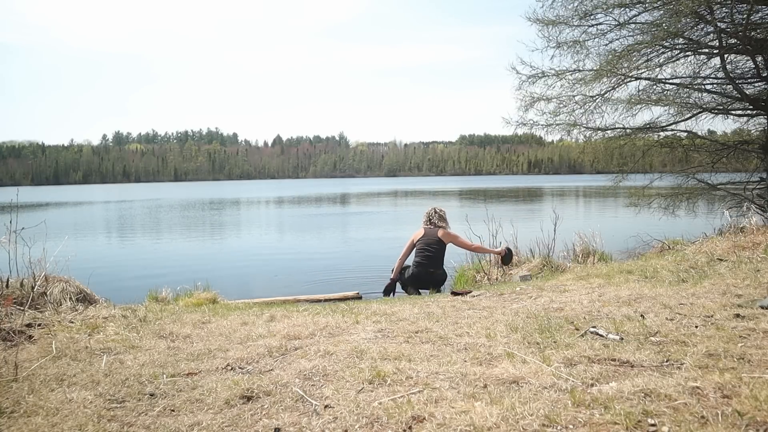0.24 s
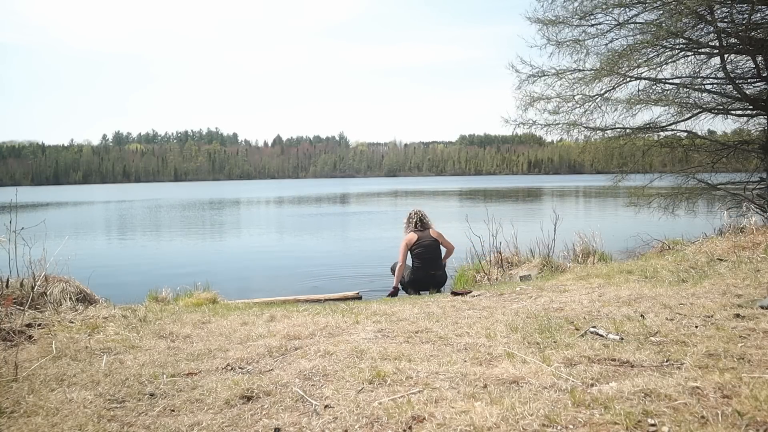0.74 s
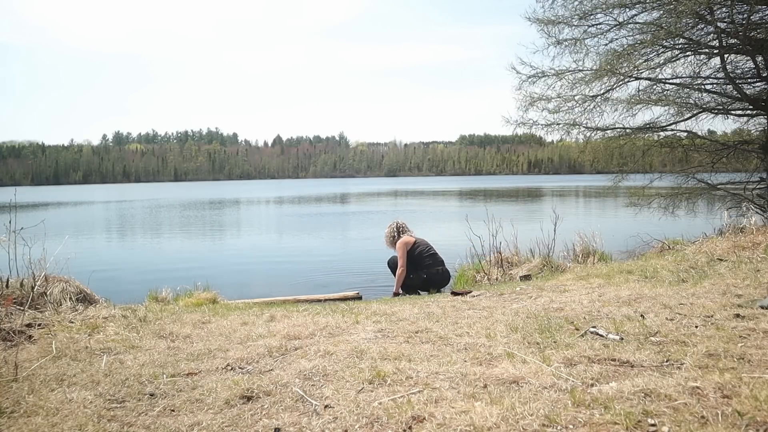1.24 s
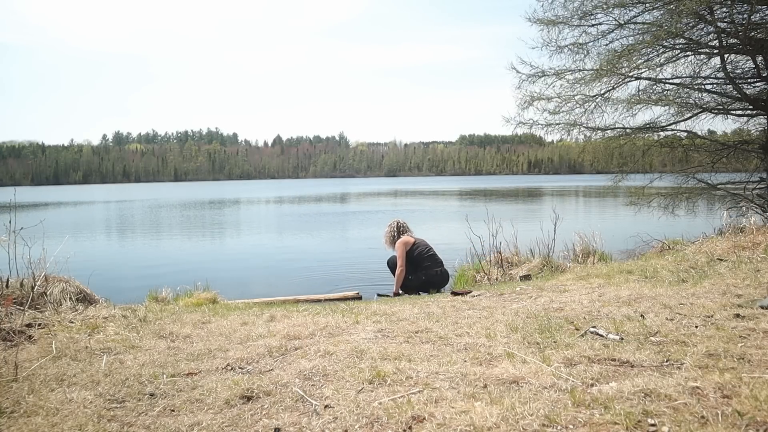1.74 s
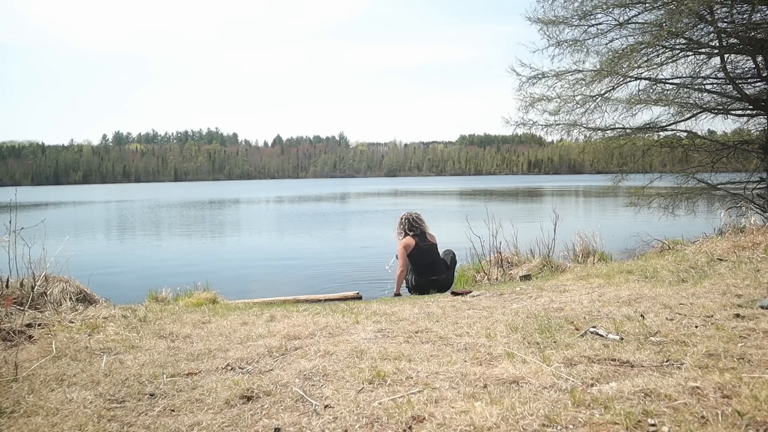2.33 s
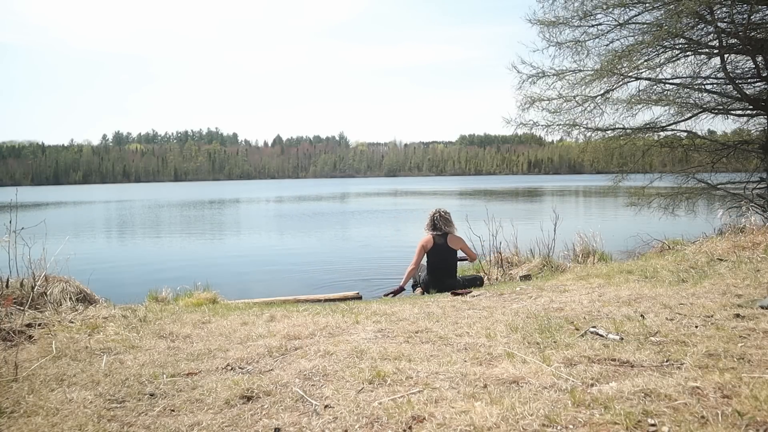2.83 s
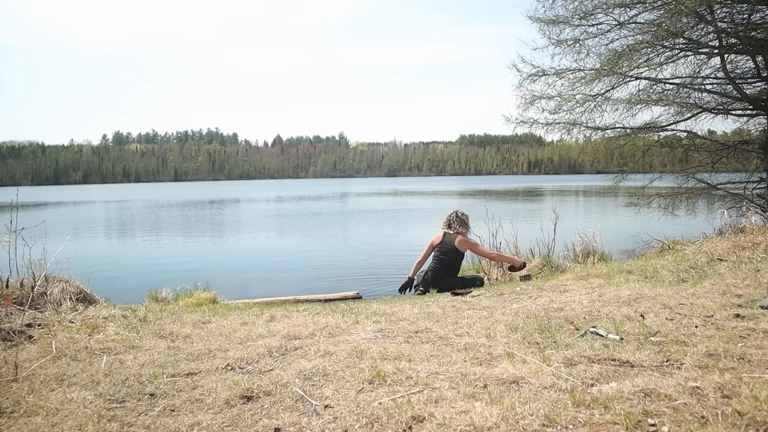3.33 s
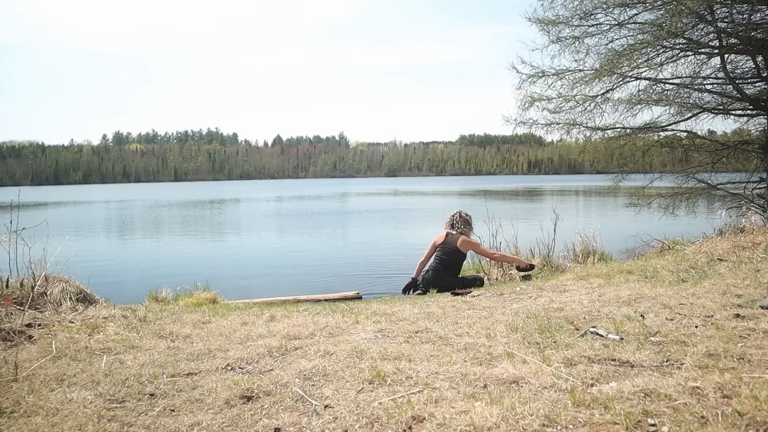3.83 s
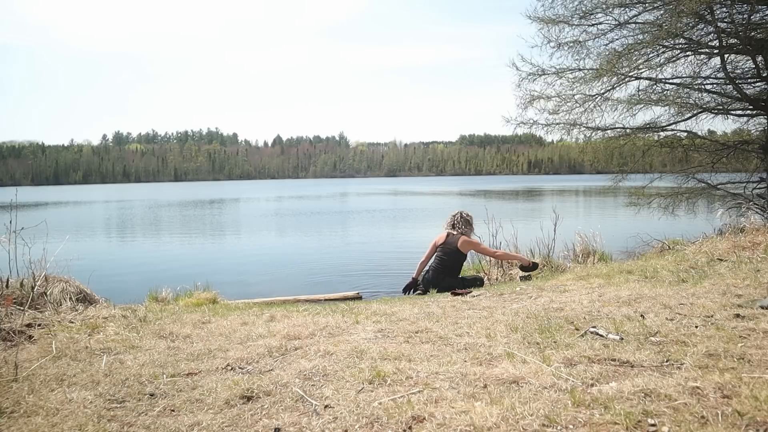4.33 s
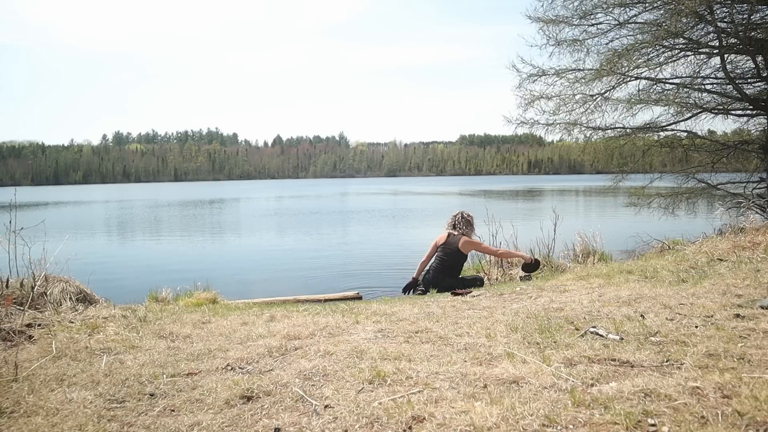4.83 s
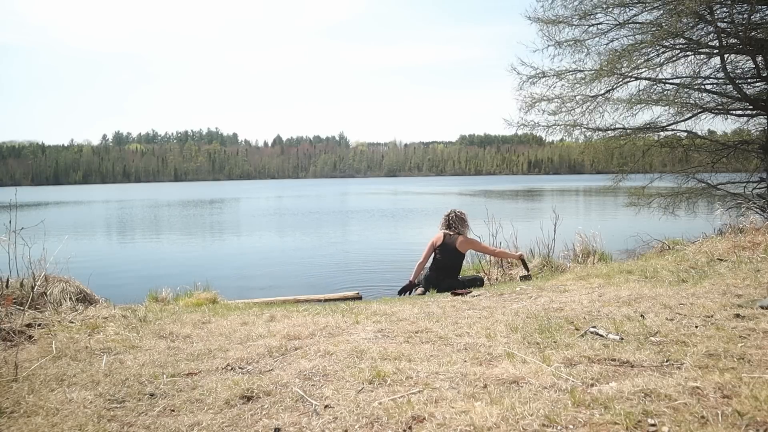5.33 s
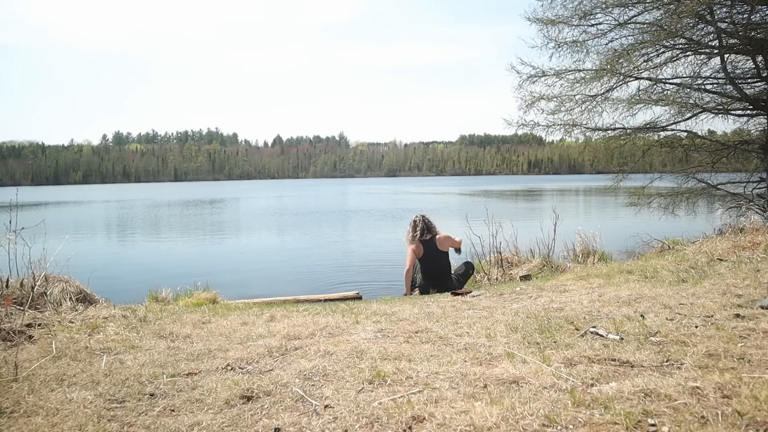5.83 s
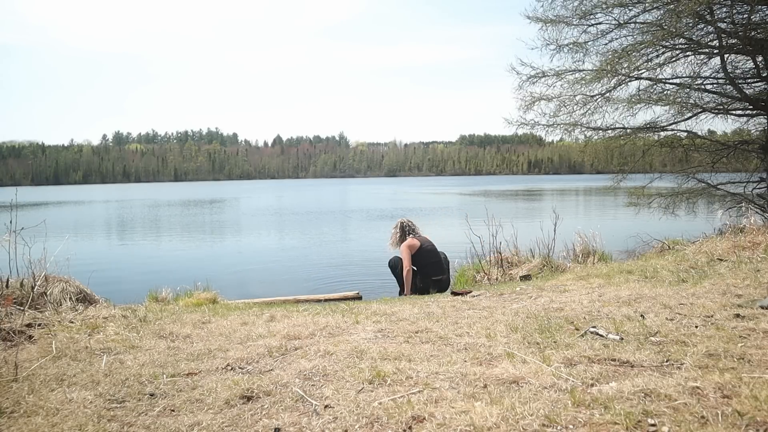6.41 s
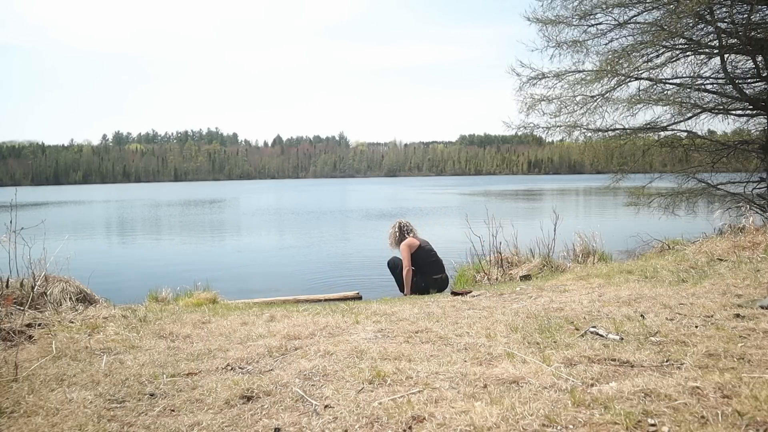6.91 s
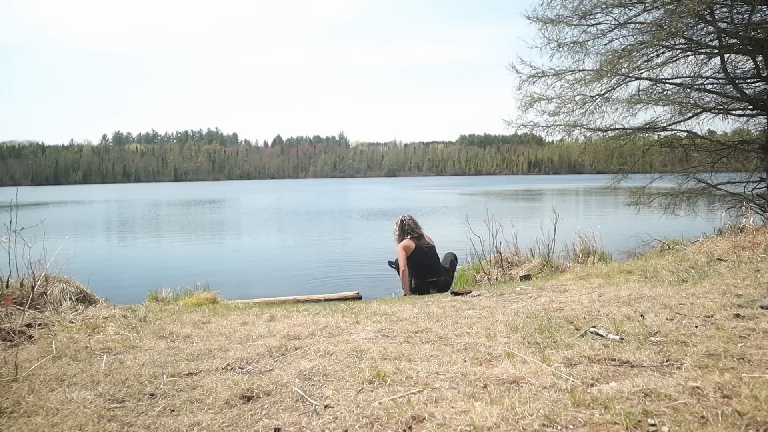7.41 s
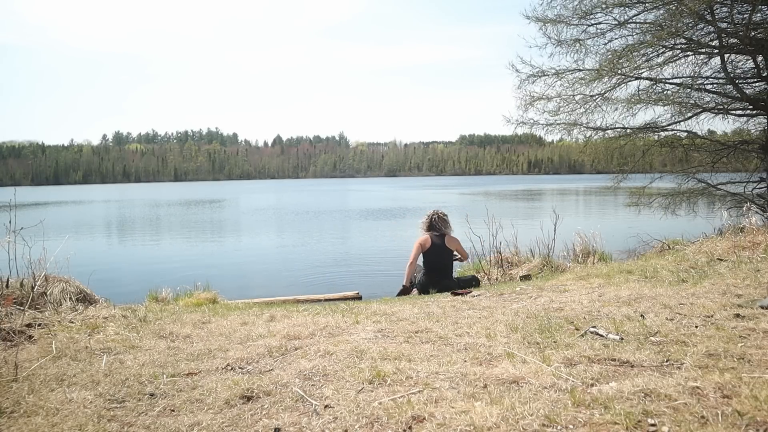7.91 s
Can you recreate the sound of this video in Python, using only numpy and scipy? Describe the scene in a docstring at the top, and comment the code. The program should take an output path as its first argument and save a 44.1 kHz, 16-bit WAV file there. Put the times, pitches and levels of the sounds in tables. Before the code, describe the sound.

Steady pulsing toad trills over a calm lake, with low wind rumbles, small splashes, dry grass ticks, a few cloth rubs and a click.

```python
"""A chorus of toads trills across a lake while gusts rumble on the microphone.
Pulsed tones form the trills and shaped noise the wind; something small chitters in tiny high tones.
Dry grass ticks in noise bursts; water plops as gliding tones and splashes as shaped noise.
Cloth rustles close by as noise through moving resonances, followed by one sharp, ringing click."""
import sys
import numpy as np
from scipy import signal
from scipy.fft import rfft, irfft, next_fast_len
from scipy.io import wavfile
from scipy.ndimage import uniform_filter1d

SR = 44100
rng = np.random.default_rng(int(sys.argv[2]) if len(sys.argv) > 2 else 0)


def int16_out(signal):
    """Quantize to a 16-bit WAV file."""
    q = np.round(np.clip(np.atleast_2d(signal).T, -1, 1) * 32767)
    wavfile.write(sys.argv[1], SR, q.astype(np.int16))


N = 359855
T = np.arange(N) / SR  # time in seconds

# The nearer toads. Each row: start in seconds, end in seconds, pitch in Hz, pulses a second,
# relative level in dB.
NEAR_TOADS = [(-4, 5.26, 1570, 53.4, -8), (-2, 1.05, 1650, 62, -3), (2, 3.63, 1870, 47.5, -5),
              (1.1, 5.4, 1715, 50.2, -6.5), (1.5, 4.85, 1646, 44.5, -1), (3.5, 9, 1488, 51.7, -13),
              (5, 9, 1365, 47.6, -14.5), (4.5, 9, 1754, 52.1, -3.5)]
# The nearest toad, whose rate and pitch drift. Each row: time in seconds, pulses a second,
# pitch in Hz, relative level in dB.
NEAREST_TOAD = [(0, 54.9, 1770, 1), (1.4, 54.9, 1760, 2), (2.4, 53.2, 1720, 5), (3.4, 55.0, 1710, 1),
                (4.8, 55.0, 1715, 3), (6.5, 55.1, 1715, 1), (7.3, 54.3, 1715, 1.5), (8.16, 52.5, 1705, 0)]
# The far crowd. Each row: time in seconds, central pitch in Hz, relative level in dB.
FAR_CROWD = [(0, 1770, 2), (2.5, 1694, 3.5), (4.6, 1683, 5), (5.4, 1672, 3), (8.16, 1678, -4.5)]
# Radiation of the vocal sacs. Each row: frequency in Hz, relative level in dB.
SAC_RADIATION = [(900, -28), (1250, 2.5), (1500, -1.5), (1820, 0.5), (1950, -3.5), (2100, 6), (2600, -34)]
# The whole chorus, softer once several toads fall silent. Each row: time in seconds, mean level in dB.
CHORUS_LEVEL = [(0, -33.5), (4.6, -33.7), (5.35, -37), (7.1, -36), (8.16, -39)]

# Gusts on the microphone. Each row: start in seconds, time held in seconds, level in dB.
GUSTS = [(0, 0.52, -47.5), (.7, .5, -55), (1.33, .2, -43.5), (1.62, 1.536, -39), (4.95, 0.34, -55.5),
         (5.46, .17, -44.5), (5.92, 0.83, -38.5), (6.68, 0.68, -33.5), (7.58, 0.15, -29), (8.05, .11, -29)]
GUST_RISE_S, GUST_FALL_S, LULL_DB = 0.1, 0.15, -70.5
# Spectrum of gust rumble. Each row: frequency in Hz, relative density in dB per Hz.
RUMBLE_SPECTRUM = [(12, -3.5), (30, 1), (60, -3), (100, -9), (160, -15.5), (250, -24.5), (400, -36),
                   (900, -63), (3000, -100)]
# Spectrum of still air over the lake. Each row: frequency in Hz, relative density in dB per Hz.
AIR_SPECTRUM = [(20, -23), (100, 5), (300, 4.5), (700, -0.5), (1200, -1), (2400, -8.5), (4000, -13.5),
                (6500, -13.5), (8500, -16), (11000, -16), (15500, -17.5)]
AIR_DB = -53
# The breeze dies down, with one revival. Each row: time in seconds, sough in the trees in dB,
# hiss in dry grass in dB, both before flutter.
BREEZE = [(0, -43, -43), (.2, -50, -50), (1, -51, -56), (1.5, -50.5, -61.5), (2.2, -55.5, -59.5),
          (3.3, -57.5, -63.5), (5.25, -52.5, -68), (6, -59.5, -71), (8.16, -62, -67)]
# Spectrum of the sough in the trees. Each row: frequency in Hz, relative density in dB per Hz.
TREE_SPECTRUM = [(20, -16), (60, -7), (250, 0), (500, 1), (750, -1), (1050, -2.5), (1400, -1.5),
                 (2300, -10), (5000, -31)]
# Spectrum of the hiss in dry grass. Each row: frequency in Hz, relative density in dB per Hz.
GRASS_SPECTRUM = [(1000, -3), (2300, 2), (3400, 1), (5000, -2), (7000, -1), (8800, 3), (10500, -6.5),
                  (15000, -5.5)]

# Accented chips of the small chitter. Each row: time in seconds, relative peak in dB.
CHIPS = [(0.794, -36), (0.8779, -37), (0.9453, -35.5), (1.0465, -41), (1.09, -38), (1.1154, -40),
         (1.1263, -41), (1.166, -41), (1.2331, -38), (1.3573, -40), (1.418, -41), (1.429, -36),
         (1.508, -39)]
# A quick uneven patter among the chips swells and fades in one arch.
PATTER_START_S, PATTER_LENGTH_S, PATTER_PER_S, PATTER_DB = 0.63, 1, 96, -51

# Louder ticks of dry stalks. Each row: time in seconds, relative level in dB.
TICKS = [(1.235, -40.5), (2.15, -47), (2.2994, -46), (2.572, -45), (2.616, -44), (3.115, -45),
         (3.3014, -47), (3.455, -43), (6.036, -47), (6.095, -46), (7.378, -46)]
# Spectrum of a tick. Each row: frequency in Hz, relative density in dB per Hz.
TICK_SPECTRUM = [(1500, -16), (3500, -3), (6000, -7.5), (8800, 1), (11000, -10), (15500, -12.5)]
# Weaker ticks fall at random while the grass is pressed down.
CRUSH_START_S, CRUSH_END_S, CRUSH_DB = 1.8, 3.1, -45.5

# Louder splashes. Each row: time in seconds, relative level in dB.
SPLASHES = [(1.366, -35), (1.8138, -37), (1.9455, -34), (2.036, -34.5), (2.0921, -42), (2.2438, -40),
            (2.591, -44), (2.6553, -32.5), (2.734, -33.5), (5.093, -37), (6.962, -35), (7.639, -37),
            (7.7123, -38.5)]
SPLASH_T60_S = 0.054
# Spectrum of splash spray. Each row: frequency in Hz, relative density in dB per Hz.
SPRAY_SPECTRUM = [(200, -17), (600, 0), (1200, 7.5), (2400, 4.5), (3800, -8.5), (6000, -18), (9000, -19),
                  (15000, -32)]
# Air bubbles at the bank. Each row: time in seconds, peak in dB, starting pitch in Hz,
# pitch rise in octaves a second (negative falls), length in seconds.
BUBBLES = [(1.42, -44.5, 540, 20, 0.018), (1.506, -48, 648, 10.5, .031), (1.574, -47, 773, 11, 0.018),
           (1.744, -41, 907, -10, .017), (1.851, -36.5, 440, 13, 0.053), (2.661, -41, 626, 33, .012),
           (2.663, -43, 1070, 14, 0.011), (2.71, -41, 1190, 2, 0.018), (5.297, -45.5, 986, 7, .02),
           (6.66, -43, 402, 22, .014), (6.785, -42.5, 553, -6.5, 0.032), (6.802, -42, 351, 8, 0.03),
           (6.803, -35.5, 540, 31.5, 0.049), (6.83, -42, 555, 37, 0.017), (6.839, -41, 1030, 8, 0.023),
           (7.313, -36.5, 585, 13, 0.033), (7.343, -39, 552, 2, 0.04), (7.607, -40, 1210, -34, 0.014),
           (7.697, -45, 1050, 17, 0.022)]
# Water stirred at the bank. Each row: time of the crest in seconds, level in dB before spatter,
# half length (the standard deviation of the swell) in seconds.
SLOSHES = [(1.58, -66, .1), (1.93, -58, 0.086), (2.692, -49.5, 0.073), (6.803, -66, .1),
           (7.271, -53.5, 0.086), (7.685, -50.5, 0.07)]
# Spectrum of a slosh. Each row: frequency in Hz, relative density in dB per Hz.
SLOSH_SPECTRUM = [(250, -17), (700, 7), (1250, 12), (2400, 6.5), (3800, -1.5), (6000, -3.5), (8500, -6.5),
                  (11000, -17), (15000, -22)]
# Each slosh frees small bubbles of chance size; their length is a number of starting-pitch cycles.
FIZZ_LOW_HZ, FIZZ_HIGH_HZ, FIZZ_OVER_DB = 502, 5000, 3.5
FIZZ_CYCLES, FIZZ_OCTAVES_PER_S = 12, 10.6

# Strokes of cloth on cloth. Each row: start in seconds, time held in seconds,
# relative level of the dull rub in dB, relative level of the bright swish in dB.
STROKES = [(3.11, 0.079, -68, -59.5), (3.59, 0.074, -50.5, -46), (3.68, .36, -52.5, -53),
           (3.81, 0.14, -46.5, -43), (4.07, 0.23, -51.5, -51.5), (4.36, 0.18, -53, -51),
           (4.571, .07, -46, -46), (4.68, 0.085, -48.5, -49.5), (4.8, 0.19, -51, -56.5),
           (4.86, 0.0056, -45, -66)]
STROKE_RISE_S, STROKE_FALL_S = 0.027, 0.047
# Spectrum of the dull rub. Each row: frequency in Hz, relative density in dB per Hz.
RUB_SPECTRUM = [(30, -24), (100, -13), (400, -2.5), (1000, 7), (2200, 0), (3000, -6), (3900, -7.5),
                (4700, -10), (7000, -12), (15000, -49)]
# Spectrum of the bright swish. Each row: frequency in Hz, relative density in dB per Hz.
SWISH_SPECTRUM = [(2000, -14), (4500, -10), (5400, -3), (6500, -4.5), (7500, -4.5), (9100, 1.5),
                  (10300, -7), (12000, -4.5), (14000, -3), (16000, -6)]
# Two resonances of the folds, lower by the end. Each row: time in seconds,
# low resonance in Hz, high resonance in Hz, both before random shift.
FOLDS = [(3.6, 3640, 8200), (3.88, 3800, 8200), (4.0, 3560, 7040), (4.45, 3860, 7520), (4.68, 2650, 6850),
         (5.05, 2250, 7400)]

# The sharp click. Each row: time in seconds, relative level in dB.
CLICKS = [(5.3858, -33.5)]
# Spectrum of its snap. Each row: frequency in Hz, relative density in dB per Hz.
SNAP_SPECTRUM = [(500, 3), (2500, -1), (3500, -6), (4900, 1.5), (6300, -11), (8300, 4), (10000, -6),
                 (15500, -9)]
# Modes of its ring. Each row: frequency in Hz, relative level in dB, 60 dB decay time in seconds.
RING_MODES = [(4830, -10, .03), (7390, -11, 0.068), (8100, -12, .04), (8760, -6, .04)]

EDGE_HZ = 15750  # upper edge of the audible band


def amp(db):
    """Logarithmic level: 20 dB is a factor of ten in amplitude."""
    return 10 ** (np.asarray(db) / 20)


def evened(x):
    """Power normalization: scales a signal to rms 1."""
    return x / np.sqrt(np.mean(x ** 2) + 1e-20)


def follow(rows):
    """Linear interpolation: gives each column of a time table at every sample."""
    times, *columns = np.transpose(rows)
    return [np.interp(T, times, column) for column in columns]


def colour(x, points):
    """Linear filtering: weights the spectrum by dB points joined along log frequency."""
    point_hz, db = np.transpose(points)
    hz = np.fft.rfftfreq(len(x), 1 / SR)
    gain = amp(np.interp(np.log(hz + 1), np.log(point_hz + 1), db))
    return irfft(rfft(x) * gain, len(x))


def noise(points):
    """Coloured noise: white noise filtered to a given spectrum and scaled to rms 1."""
    white = rng.standard_normal(next_fast_len(N))
    return evened(colour(white, points))[:N]


def wander(rate):
    """Random modulation: straight lines join chance values, rate of them a second, at rms 1."""
    knots = rng.standard_normal(4096)
    return evened(np.interp(T * rate, np.arange(len(knots)), knots))


def add(mix, s, sound):
    """Superposition: adds a sound in place at time s, cut off at the end of the mix."""
    part = mix[max(round(s * SR), 0):][:len(sound)]
    part += sound[:len(part)]


def echoes(x, t60, delay):
    """Scattering from water, banks and trees: sparse taps of random sign die away after a delay."""
    t = np.arange(SR) / SR
    sparse = rng.random(SR) < 2000 / SR  # about 2000 taps a second
    decay = amp(-60 * t / t60)
    taps = rng.standard_normal(SR) * sparse * (t > delay) * decay
    return signal.oaconvolve(x, taps / np.linalg.norm(taps))[:N]


def swells(rows, rise, fall):
    """Addition of powers: the joint gain of events that each build up, hold and die away."""
    power = 0
    for start, held, db in rows:
        before = np.maximum(start - T, 0)
        after = np.maximum(T - start - held, 0)
        power = power + (amp(db) * np.exp(-before / rise - after / fall)) ** 2
    return np.sqrt(power)


def burst(source, s, t60, rise):
    """Impulsive excitation: a piece of noise rises fast and decays exponentially."""
    part = source[round(s * SR):][:SR // 2]
    t = np.arange(len(part)) / SR
    return part * (1 - np.exp(-t / rise)) * amp(-60 * t / t60)


def trill(rate, hz, rise=0.0021, fall=0.0027, glide_hz=80, flutter_db=2.0, waver_hz=18):
    """Amplitude modulation: one toad's train of tones that each swell, sink in pitch and fade."""
    turns = np.cumsum(rate * (1 + .004 * wander(3))) / SR + rng.random()
    cycle = turns % 1
    age = (cycle - .4) / rate  # seconds from the crest of the pulse
    # no two pulses are alike
    phase, size, detune = rng.standard_normal((1024, 3))[turns.astype(int)].T
    skewed = np.exp(-.5 * (age / np.where(age < 0, rise, fall)) ** 2)
    swell = skewed * np.sin(np.pi * cycle) ** .5
    steady_cycles = (hz + waver_hz * detune) * age
    sinking_cycles = .5 * glide_hz * age ** 2 / fall
    tone = np.sin(2 * np.pi * (steady_cycles - sinking_cycles + .3 * phase))
    return evened(swell * tone * amp(flutter_db * np.minimum(size, 1.6)))


def chorus(spread_hz=120, ebb_db=0.73, count=8):
    """Superposition of callers: near toads and a far crowd overlap and ring over the lake."""
    rate, hz, db = follow(NEAREST_TOAD)
    near = amp(db) * trill(rate, hz)
    for start, end, hz, rate, db in NEAR_TOADS:
        calling = np.clip(np.minimum(T - start, end - T) / 0.5, 0, 1)
        near += amp(db) * calling * trill(rate, hz)
    near = near + amp(-9) * echoes(near, t60=.45, delay=.004)

    hz, crowd_db = follow(FAR_CROWD)
    offsets = np.linspace(-1, 1, count)
    far = evened(sum(trill(rng.uniform(40, 57), hz + spread_hz * k) for k in offsets))
    far = amp(crowd_db) * evened(far + amp(-3) * echoes(far, t60=0.72, delay=0.018))

    voices = colour(near + far, SAC_RADIATION)
    # level the joint power over about 0.2 s, then let all voices swell and ebb as one
    steady = voices / np.sqrt(uniform_filter1d(voices ** 2, size=9000) + 1e-12)
    return amp(follow(CHORUS_LEVEL)[0] + ebb_db * wander(7)) * steady


def wind(lumps_db=1.5):
    """Turbulent pressure: lumpy gusts at the microphone over still air and a breeze in trees and grass."""
    force = np.hypot(swells(GUSTS, GUST_RISE_S, GUST_FALL_S), amp(LULL_DB))
    rumble = force * evened(noise(RUMBLE_SPECTRUM) * amp(lumps_db * wander(16)))
    sough_db, hiss_db = follow(BREEZE)
    sough = amp(sough_db + 1.7 * wander(20)) * noise(TREE_SPECTRUM)
    hiss = amp(hiss_db + 1.2 * wander(40)) * noise(GRASS_SPECTRUM)
    return rumble + sough + hiss + amp(AIR_DB) * noise(AIR_SPECTRUM)


def chitter(chip_db=-3, chip_hz=5250, chip_width=0.0021, wet_db=-10, spread_db=4, jitter=.3, detune_hz=60):
    """Repeated tone bursts: something small runs through tiny high tones, a few of them accented."""
    out, t = np.zeros(N), np.arange(SR // 60) / SR
    late, size, detune = rng.standard_normal((256, 3)).T
    chips = [(s, amp(db + chip_db)) for s, db in CHIPS]
    pulses = PATTER_LENGTH_S * PATTER_PER_S
    for k in range(int(pulses)):
        s = PATTER_START_S + (k + jitter * late[k]) / PATTER_PER_S
        arch = np.sin(np.pi * k / pulses)
        chips.append((s, amp(PATTER_DB + spread_db * min(size[k], 1.5)) * arch))
    age = (t / chip_width) ** 2
    swell = age * np.exp(1 - age)  # peaks at 1 after chip_width seconds
    for (s, gain), off in zip(chips, detune):
        add(out, s, gain * swell * np.sin(2 * np.pi * (chip_hz + detune_hz * off) * t))
    return out + amp(wet_db) * echoes(out, t60=0.24, delay=.003)


def grass(tick_db=1, spread_db=2, count=14):
    """Impulsive radiation: dry stalks tick in a few clear snaps among weaker chance ones."""
    ticks, crackle = np.zeros(N), noise(TICK_SPECTRUM)
    weak = []
    for when, size in rng.random((count, 2)):
        s = CRUSH_START_S + (CRUSH_END_S - CRUSH_START_S) * when
        weak.append((s, CRUSH_DB + spread_db * (2 * size - 1)))
    for s, db in TICKS + weak:
        add(ticks, s, amp(db + tick_db) * burst(crackle, s, t60=0.016, rise=0.00028))
    return ticks


def bubble(db, hz, glide, length):
    """Oscillation of trapped air: a short tone swells quickly, glides in pitch and fades."""
    t = np.arange(0, length, 1 / SR)
    tone = np.sin(2 * np.pi * np.cumsum(hz * 2 ** (glide * t)) / SR)
    swell = np.sqrt(abs(np.sin(np.pi * (t / length) ** 0.58)))
    return amp(db) * swell * tone


def water(splash_db=-4, bubble_wet_db=-12, splash_wet_db=-8, spatter_db=4, fizz_spread_db=8, count=22):
    """Bubble resonance and spray: bubbles glide as they reach the surface; stirred water hisses around them."""
    plops = np.zeros(N)
    for s, *shape in BUBBLES:
        add(plops, s, bubble(*shape))

    spatter = evened(amp(spatter_db * wander(300)))  # the clumped fall of droplets
    stirring = sum(amp(db) * np.exp(-.5 * ((T - s) / half) ** 2) for s, db, half in SLOSHES)
    splashes = stirring * spatter * noise(SLOSH_SPECTRUM)
    spray = spatter * noise(SPRAY_SPECTRUM)
    for s, db in SPLASHES:
        add(splashes, s, amp(db + splash_db) * burst(spray, s, SPLASH_T60_S, rise=0.00021))

    for s, db, half in SLOSHES:
        for when, small, weak in rng.random((count, 3)):
            hz = FIZZ_LOW_HZ * (FIZZ_HIGH_HZ / FIZZ_LOW_HZ) ** small
            fizz_db = db + FIZZ_OVER_DB - fizz_spread_db * weak
            fizz = bubble(fizz_db, hz, FIZZ_OCTAVES_PER_S, FIZZ_CYCLES / hz)
            add(plops, s + 1.5 * half * (2 * when - 1), fizz)
    sent = amp(bubble_wet_db) * plops + amp(splash_wet_db) * splashes
    return plops + splashes + echoes(sent, t60=0.29, delay=0.0051)


def resonate(x, hz, width):
    """Heterodyning: shifts the curve hz to zero, smooths twice and shifts back, a moving resonance."""
    turn = np.exp(2j * np.pi * np.cumsum(hz) / SR)
    r = np.exp(-np.pi * width / SR)
    smooth = signal.lfilter([1], [1, -2 * r, r * r], x / turn)
    return (turn * smooth).real


def cloth(rub_db=2, swish_db=-1, low_db=-4, high_db=-4, low_width=1100, high_width=1200,
          grain_db=1.16, catch_db=0.25, shift=0.039):
    """Sliding friction: fabric strokes fabric, its weave catching unevenly and its folds resonating."""
    start, held, rub_levels, swish_levels = np.transpose(STROKES)
    rub = swells(zip(start, held, rub_levels), STROKE_RISE_S, STROKE_FALL_S)
    swish = swells(zip(start, held, swish_levels), STROKE_RISE_S, STROKE_FALL_S)
    low_hz, high_hz = (hz * (1 + shift * wander(14)) for hz in follow(FOLDS))
    friction = rng.standard_normal(N)
    low_fold = evened(resonate(friction, low_hz, low_width))
    high_fold = evened(resonate(friction, high_hz, high_width))
    dull = amp(rub_db) * noise(RUB_SPECTRUM) + amp(low_db) * low_fold
    bright = amp(swish_db) * noise(SWISH_SPECTRUM) + amp(high_db) * high_fold
    weave = amp(grain_db * wander(220) + catch_db * wander(30))
    return weave * (rub * dull + swish * bright)


def click(snap_db=-1, ring_db=0):
    """Modal ringing: a small hard catch gives a noise snap and briefly ringing tones."""
    out, t = np.zeros(N), np.arange(SR // 8) / SR
    ring = sum(amp(db - 60 * t / t60) * np.sin(2 * np.pi * hz * t) for hz, db, t60 in RING_MODES)
    for s, db in CLICKS:
        snap = burst(noise(SNAP_SPECTRUM), s, t60=0.046, rise=.0006)
        add(out, s, amp(db + snap_db) * snap)
        add(out, s, amp(db + ring_db) * ring)
    return out


def scene():
    """Superposition: everything heard from the bank, as one channel."""
    mix = chorus() + wind() + chitter() + grass() + water() + cloth() + click()
    return mix[None]


def record(dry):
    """Band limitation: a symmetric low-pass filter removes the range above EDGE_HZ."""
    lowpass = signal.firwin(701, EDGE_HZ, window=("kaiser", 9), fs=SR)
    return signal.oaconvolve(dry, lowpass[None], "same")


dry = scene()
out = record(dry)
int16_out(out)
```